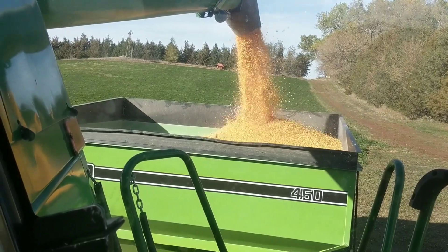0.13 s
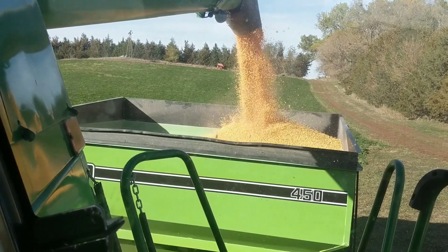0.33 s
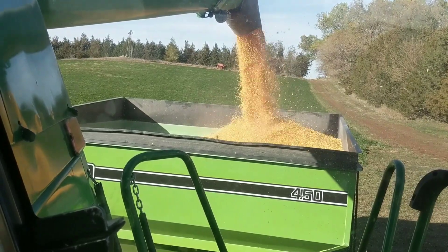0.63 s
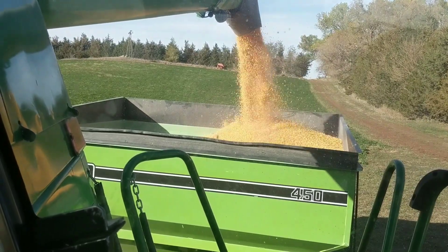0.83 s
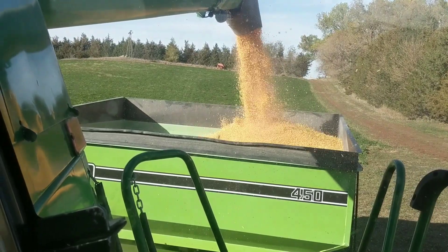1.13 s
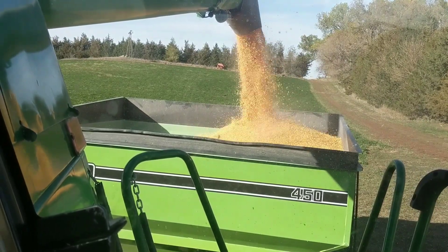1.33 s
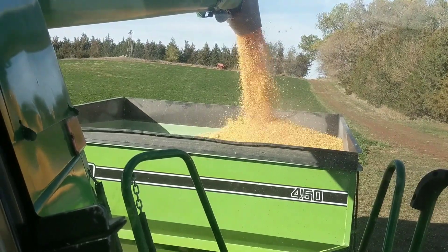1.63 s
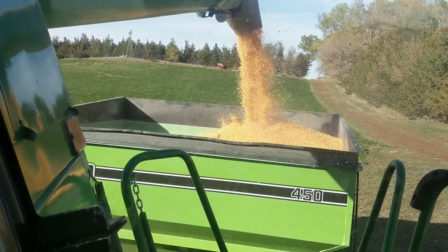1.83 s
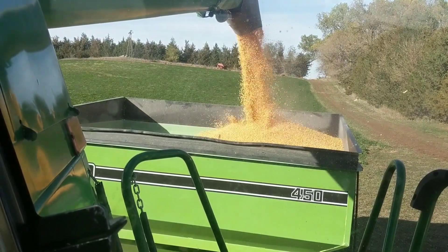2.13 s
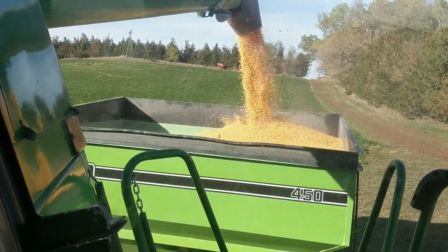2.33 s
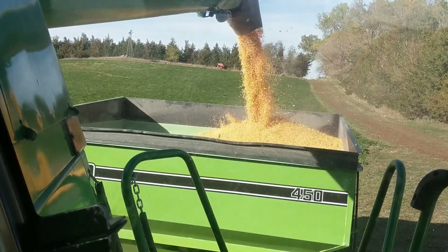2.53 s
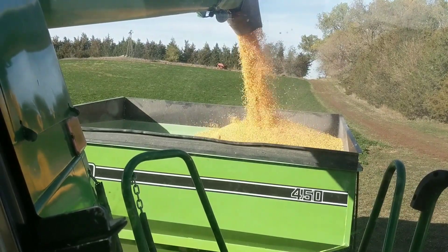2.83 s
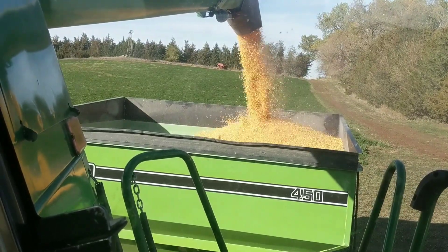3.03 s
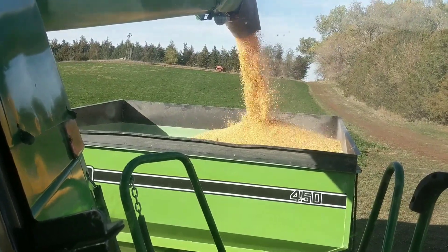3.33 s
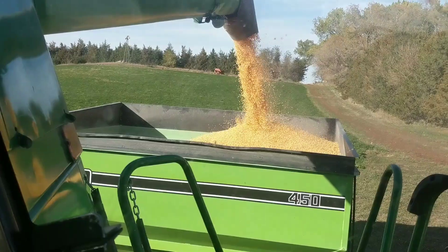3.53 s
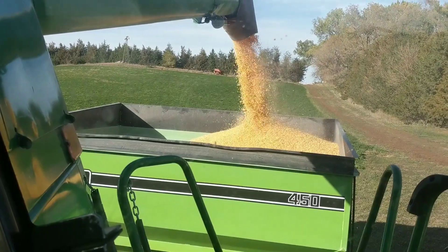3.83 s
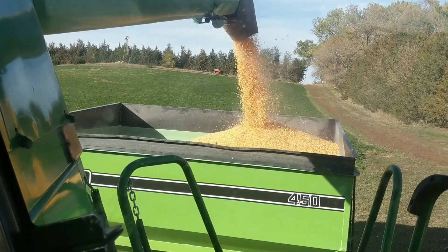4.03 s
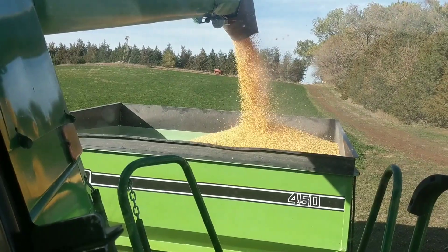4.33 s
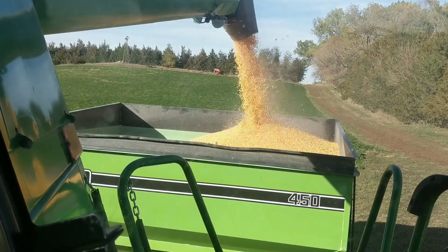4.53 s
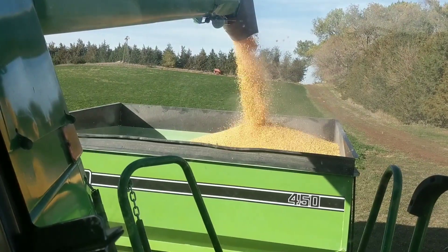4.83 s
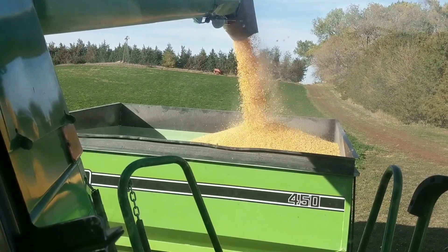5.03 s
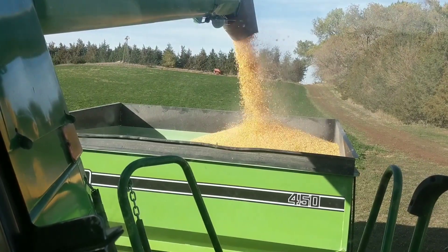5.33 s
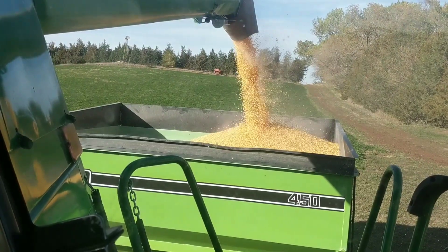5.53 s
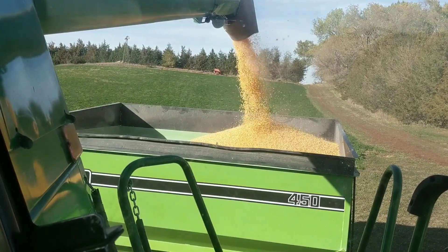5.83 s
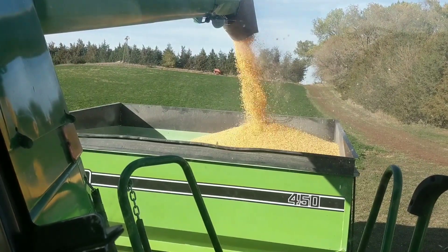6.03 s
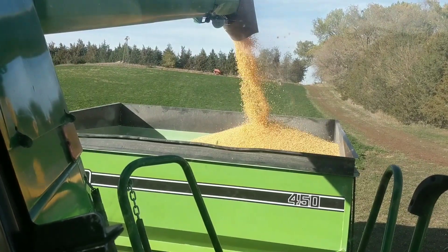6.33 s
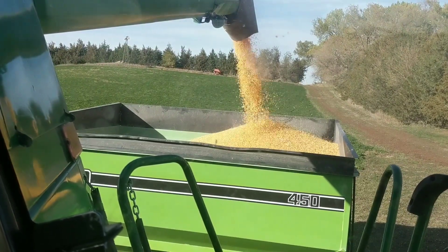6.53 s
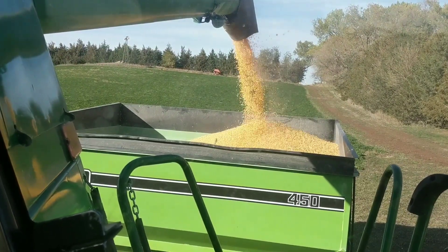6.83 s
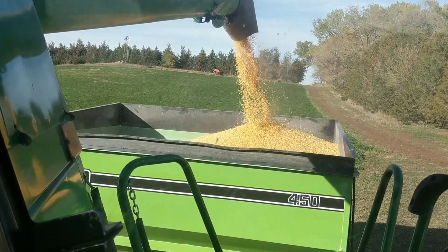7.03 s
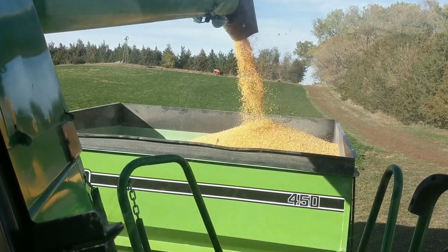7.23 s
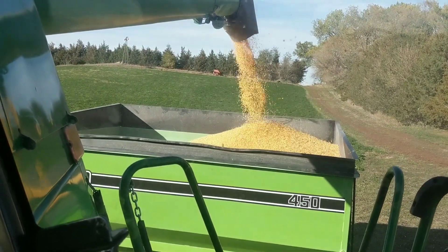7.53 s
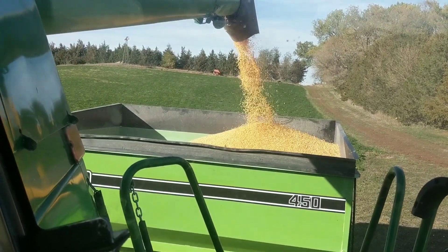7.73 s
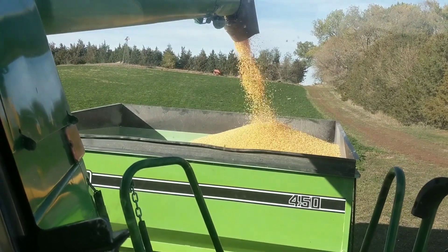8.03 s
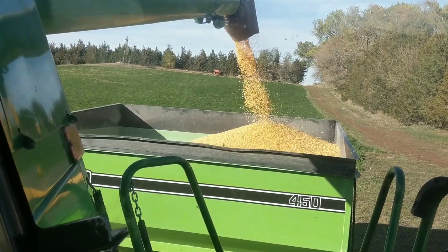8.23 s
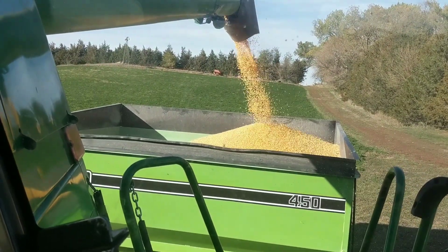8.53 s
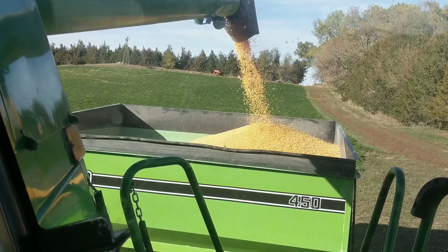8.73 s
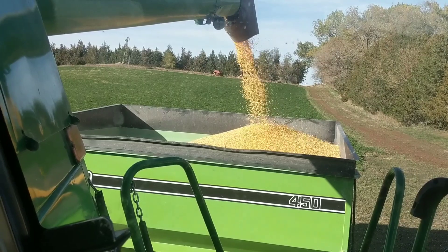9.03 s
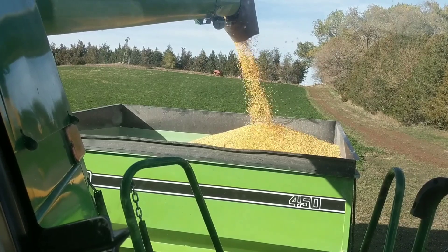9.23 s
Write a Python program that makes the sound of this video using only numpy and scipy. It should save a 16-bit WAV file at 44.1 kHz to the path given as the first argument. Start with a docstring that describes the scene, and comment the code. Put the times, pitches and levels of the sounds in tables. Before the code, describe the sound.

A harvester's diesel and unloading auger drone loudly from the cab while corn hisses faintly into a cart, the chain's tone fading toward a hollow throb.

```python
"""A combine harvester unloads corn into a cart, heard from its cab.
The diesel, steady hums, pump and gear whine throughout as tones tied to one clock. At first the auger's
chain drones as tooth harmonics and kernels strike bare steel as filtered impacts, until the heap covers it.
As the tube empties the drone fades, a once-a-turn throb grows and the tube's filtered noise booms more.
Corn patters and hisses to the end as filtered impacts; late on, the thinning stream patters a little louder."""
import sys
import numpy as np
from scipy import signal
from scipy.fft import rfft, irfft, next_fast_len
from scipy.io import wavfile
from scipy.ndimage import map_coordinates

SR = 44100
rng = np.random.default_rng(int(sys.argv[2]) if len(sys.argv) > 2 else 0)


def put_to_file(sound):
    """Save the sound as 16-bit audio at rate SR, in the file named by the first command-line argument."""
    columns = np.atleast_2d(sound).T  # one column per channel
    safe = np.clip(columns, -1, 1)
    whole_steps = np.round(safe * 32767)
    wavfile.write(sys.argv[1], SR, whole_steps.astype(np.int16))


N = 414099

# strength of the falling corn's stream, as the level of its hiss: time_s, level_db
STREAM_LEVEL = [(0, -63.5), (1.2, -64), (1.8, -62), (3.0, -62), (4.0, -62.5), (4.9, -64), (9.39, -65)]


def amp(db):
    """Decibels to gain."""
    return 10 ** (np.asarray(db) / 20)


def unit(x):
    """Scale to rms 1."""
    return x / np.sqrt(np.mean(x ** 2) + 1e-20)


def curves(rows):
    """One value per sample for each column after the time."""
    time_s, *columns = np.transpose(rows)
    return [np.interp(np.arange(N) / SR, time_s, column) for column in columns]


def wobble(rate):
    """A smooth random curve, rate knots a second."""
    knots = rng.standard_normal(int(N * rate / SR) + 4)
    return map_coordinates(knots, [np.arange(N) * rate / SR])


def coloured(x, spectrum):
    """x through a causal minimum-phase filter with the given (Hz, dB) points, at rms 1."""
    length = 2 * next_fast_len(N // 2 + 8192)
    points_hz, points_db = np.transpose(spectrum)
    bins_hz = np.fft.rfftfreq(length, 1 / SR) + 1
    gain_db = np.interp(np.log(bins_hz), np.log(points_hz), points_db)
    # folding the cepstrum onto positive time makes the filter causal
    cepstrum = irfft(np.log(amp(gain_db)), length)
    cepstrum[1:length // 2] *= 2
    cepstrum[length // 2 + 1:] = 0
    response = np.exp(rfft(cepstrum))
    # the input repeats to fill the length, so the filter has already settled where the kept part begins
    filtered = irfft(rfft(np.resize(x, length)) * response, length)
    return unit(filtered[-N:])


def tone(cycles):
    """A sine of rms 1 along a count of cycles."""
    return np.sqrt(2) * np.cos(2 * np.pi * cycles)


def impacts(per_second, spread_db):
    """Random one-sample blows of either sign and unequal size, capped at three spreads above the middle."""
    hits = rng.random(N) < per_second / SR
    sign = np.sign(rng.standard_normal(N))
    size = np.minimum(rng.standard_normal(N), 3)
    return hits * sign * amp(spread_db * size)


def emptiness():
    """How much of the auger tube is clear of corn, 0 to 1, growing at a steady rate."""
    emptying_s = 9.4
    return np.minimum(np.arange(N) / SR / emptying_s, 1)


def emptying(levels_db):
    """A level that slides from its full-tube value to its empty-tube value."""
    full_db, empty_db = levels_db
    return full_db + (empty_db - full_db) * emptiness()


def hollowness():
    """Near 0 while corn packs the tube, near 1 once an air passage runs through it."""
    hollow_at, hollow_width = 0.3, 0.068  # shares of the tube clear of corn
    return 0.5 + 0.5 * np.tanh((emptiness() - hollow_at) / (2 * hollow_width))


def flow_db():
    """How far the stream of corn is above or below its mean level."""
    level_db, = curves(STREAM_LEVEL)
    return level_db - level_db.mean()


def diesel(clock):
    """Firing orders, and the crank's shake beating slowly against a shaft of almost the same speed."""
    # diesel, three firings a turn: multiple_of_crank_speed, mean_level_db
    firing_orders = [(1.5, -57.5), (3, -44.5), (4.5, -53.5), (5.5, -53.5), (6, -64.5)]
    crank_hz = 39.483
    crank = crank_hz * clock
    firing = 0
    for order, level_db in firing_orders:
        firing = firing + amp(level_db + wobble(2.5)) * tone(order * crank + rng.random())
    # the two shakes oppose each other, and so are weakest, at the lull
    beat_hz, lull_s = 0.872, 0.4
    other_shaft = crank + beat_hz * (clock - lull_s)
    shake = amp(-50) * tone(crank) - amp(-52.5) * tone(other_shaft)
    return firing + shake


def hums_and_whines(clock):
    """Steady tones hum, the hydraulic pump and a gear whine, all as sines tied to the engine's speed."""
    # steady hum tones, among them a low sideband of the chain, 18 times the auger's rate:
    # pitch_hz, mean_level_db
    hum_tones = [(106.1, -49.5), (131.4, -47), (134.7, -41.5), (150.1, -52.5), (202.0, -55.5), (259.2, -43),
                 (369.4, -61), (471.5, -58.5), (777.5, -75), (930.5, -80.5)]
    # hydraulic pump's whine: time_s, mean_level_db
    pump_level = [(0, -66.5), (3.0, -61), (5.5, -62.5), (6.7, -59), (8.0, -67), (9.39, -61.5)]
    pump_hz, gear_hz = 1124, 2605
    hum = 0
    for pitch_hz, level_db in hum_tones:
        hum = hum + amp(level_db + 1.4 * wobble(1.8)) * tone(pitch_hz * clock + rng.random())
    pump_db, = curves(pump_level)
    # a slight phase wander keeps both whines from sounding pure
    pump = amp(pump_db + 0.55 * wobble(8)) * tone(pump_hz * clock + 0.033 * wobble(30))
    gear = amp(-77.5 + 1.6 * wobble(3)) * tone(gear_hz * clock + 0.034 * wobble(28))
    return hum + pump + gear


def tube(clock, turns):
    """The flighting rumbles and scrapes harder once a turn; the tube booms and thumps more as it empties."""
    # spectra before scaling to rms 1: pitch_hz, relative_level_db
    rumble_spectrum = [(40, -26.5), (85, -12), (125, -0.5), (195, -7), (215, -14.5), (250, -12.5),
                       (290, -22), (450, -40), (900, -93)]
    scrape_spectrum = [(180, -31), (300, -9.5), (360, 2), (395, -7), (450, -7.5), (500, -2), (570, -9.5),
                       (690, -13), (820, -13), (900, -18), (1030, -17), (1250, -23.5), (1700, -37.5),
                       (4000, -69)]
    boom_spectrum = [(18, -33.5), (25, -20.5), (33, -8), (48, -0.5), (75, 7.5), (100, 10), (140, -6),
                     (300, -56.5), (900, -120)]
    # deep tones of the hollow tube: pitch_hz, mean_level_db (once hollow)
    deep_tones = [(67.3, -47), (80.2, -55.5), (86.0, -46.5), (88.4, -37.5)]
    # mean levels along the emptying: full_tube_db, empty_tube_db
    rumble_levels = (-36, -33)
    scrape_levels = (-47.5, -46)
    muffle_db = 5.5  # how far a packed tube holds down its boom and deep tones
    scrape_follows = 0.40  # share of the stream's swells in dB
    hollow_db = muffle_db * (hollowness() - 1)

    thump_db = 1.2 * amp(hollow_db) * tone(turns)
    rumble_db = emptying(rumble_levels) + thump_db + 0.35 * wobble(12)
    rumble = amp(rumble_db) * coloured(rng.standard_normal(N), rumble_spectrum)

    scrape_db = emptying(scrape_levels) + scrape_follows * flow_db()
    scrape_db = scrape_db + 0.41 * tone(turns) + 0.19 * wobble(8.9)
    scrape = amp(scrape_db) * coloured(rng.standard_normal(N), scrape_spectrum)

    boom = amp(-37.5) * coloured(rng.standard_normal(N), boom_spectrum)
    tones = 0
    for pitch_hz, level_db in deep_tones:
        tones = tones + amp(level_db + 0.94 * wobble(4.6)) * tone(pitch_hz * clock + rng.random())
    return rumble + scrape + amp(hollow_db) * (boom + tones)


def chain(turns, teeth_count):
    """Teeth meet the chain; the steady drone fades with the load while the once-a-turn throb grows."""
    # overtones of the loaded chain: multiple_of_tooth_rate, mean_level_db (relative to the bite)
    overtones = [(2, -20.5), (4, -34.5), (5, -34), (7, -45), (8, -42)]
    # tight spot, a row for each of tooth harmonics 1-3, before the whip's gain; sidebands at these
    # multiples of the auger rate: minus_2_db, minus_1_db, plus_1_db, plus_2_db
    tight_spot = [(-53, -43, -51, -60), (-66, -68, -61, -64), (-68, -61, -69, -68)]
    # levels along the emptying: full_tube_db, empty_tube_db
    drone_levels = (-27.5, -37.5)
    bite_levels = (-26.5, -38.5)
    drone_db, bite_db = emptying(drone_levels), emptying(bite_levels)
    # the slackening chain passes through a resonance of its third tooth harmonic
    ring_top_db, ring_at_emptiness, ring_fall_db = -47, 0.61, 20.5  # fall per emptiness squared
    ring_db = ring_top_db - ring_fall_db * (emptiness() - ring_at_emptiness) ** 2

    # the links seat a little unevenly, which roughens the high harmonics most
    mesh = teeth_count * turns + 0.0085 * wobble(25) + 0.0031 * wobble(90)
    harmonics = np.arange(1, 9)[:, None] * mesh + rng.random((8, 1))
    sound = amp(drone_db) * tone(harmonics[0]) + amp(ring_db) * tone(harmonics[2])
    for multiple, level_db in overtones:
        overtone_db = bite_db + level_db + 1.6 * wobble(14)
        cycles = harmonics[round(multiple) - 1] + 0.011 * multiple * wobble(30)
        sound = sound + amp(overtone_db) * tone(cycles)

    # the tight spot comes round once a turn, never quite alike, and whips harder as the chain slackens
    slack_db = bite_db.mean() - bite_db
    whip = amp(0.27 * slack_db + 1.4 * wobble(8.2))
    for cycles, sidebands_db in zip(harmonics, tight_spot):
        for offset, level_db in zip((-2, -1, 1, 2), sidebands_db):
            # the phase grows with the square of the offset, which spreads each jolt out in time
            sideband = tone(cycles + offset * turns + offset * offset / 10)
            sound = sound + whip * amp(level_db) * sideband
    return sound


def corn(turns):
    """Kernels leave the spout in clumps, stronger once a turn, and strike steel and heap as tiny blows."""
    # spectra before scaling to rms 1: pitch_hz, relative_level_db
    patter_spectrum = [(900, -12), (1530, -.5), (1800, -4), (2180, -2), (2350, -5), (3000, -6),
                       (4000, -8.5), (5500, -19.5), (7500, -15.5), (9000, -37), (15000, -52)]
    hiss_spectrum = [(3000, -19.5), (4600, -6.5), (5050, -5.5), (5400, -7.5), (6550, -2), (7500, 0.5),
                     (7850, -4), (8250, -13.5), (8900, -17), (10100, -22), (11200, -26.5), (12700, -24),
                     (13500, -29), (15400, -30.5)]
    steel_spectrum = [(3000, -29.5), (4700, -12.5), (5050, -3.5), (5300, -11), (5600, -12.5), (7000, -16),
                      (8500, -33.5), (10100, -19), (11200, -35.5), (15400, -55)]
    # patter along the emptying, before swells and breakup: full_tube_db, empty_tube_db
    patter_levels = (-61, -58.5)
    seconds = np.arange(N) / SR
    surge_db = 0.31 * tone(turns + 0.24) + 0.38 * wobble(14)

    # the thinning stream breaks up into single kernels, which patter louder
    breakup_s, breakup_length_s, breakup_db = 7.75, 0.3, 0.5
    broken = np.clip((seconds - breakup_s) / breakup_length_s, 0, 1)
    patter_follows = 0.44  # share of the stream's swells in dB
    patter_db = emptying(patter_levels) + patter_follows * flow_db() + breakup_db * broken
    patter_blows = impacts(per_second=22000, spread_db=4.0)
    patter = amp(patter_db + surge_db) * coloured(patter_blows, patter_spectrum)

    # a thinner stream is lumpier
    hiss_db, = curves(STREAM_LEVEL)
    thinness = amp(hiss_db.mean() - hiss_db)
    clumps_db = thinness * (1.1 * wobble(90) + 0.65 * wobble(25))
    hiss_blows = impacts(per_second=18000, spread_db=1.0)
    hiss = amp(hiss_db + surge_db + clumps_db) * coloured(hiss_blows, hiss_spectrum)

    # kernels on the cart's bare steel fade once the heap starts to cover it
    bare_db, covered_s, cover_db_per_s = -67.7, 2.5, 1.2
    wall_db = bare_db - cover_db_per_s * np.maximum(seconds - covered_s, 0)
    wall_blows = impacts(per_second=7900, spread_db=5.0)
    wall = amp(wall_db + surge_db + 0.8 * wobble(15)) * coloured(wall_blows, steel_spectrum)
    return patter + hiss + wall


def scene():
    """One engine turns everything, so the tones and the auger share its small changes of speed."""
    # the governor lets the speed rise as the load goes, and hunts a little
    droop_percent, hunt_percent, hunt_knots_per_s = 0.1514, 0.05, 2.2
    droop = droop_percent * (hollowness() - hollowness().mean())
    speed_percent = droop + hunt_percent * wobble(hunt_knots_per_s)
    clock = np.cumsum(1 + speed_percent / 100) / SR  # seconds at nominal speed
    auger_hz = 7.298
    turns = auger_hz * clock
    machine = diesel(clock) + hums_and_whines(clock)
    auger = tube(clock, turns) + chain(turns, teeth_count=23)
    return (machine + auger + corn(turns))[None]


def record(dry):
    """A 4 ms fade-in, then a steep low-pass that removes the extreme treble."""
    fade_in = np.minimum(np.arange(N) / (0.004 * SR), 1)
    top_hz = 15500
    low_pass = signal.ellip(10, 0.05, 80, top_hz, fs=SR, output="sos")
    return signal.sosfilt(low_pass, dry * fade_in)


dry = scene()
out = record(dry)
put_to_file(out)
```